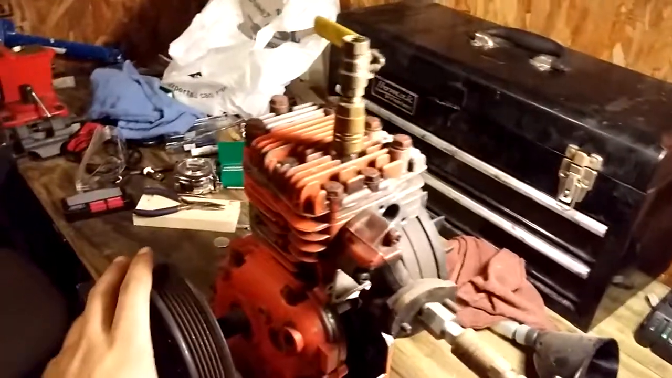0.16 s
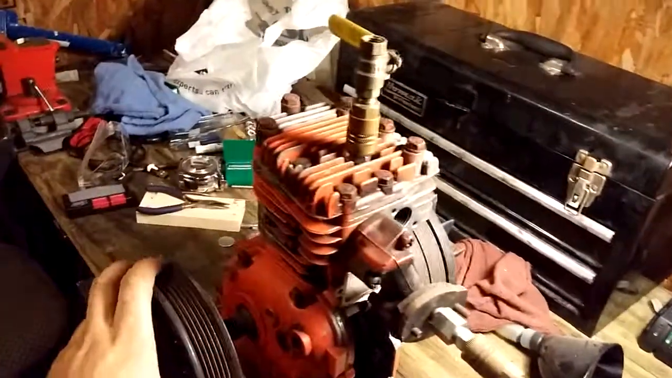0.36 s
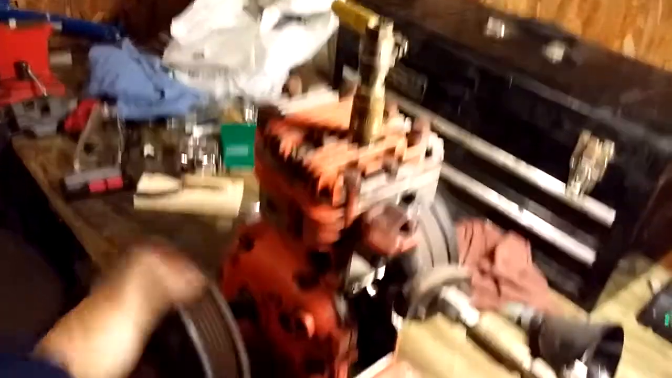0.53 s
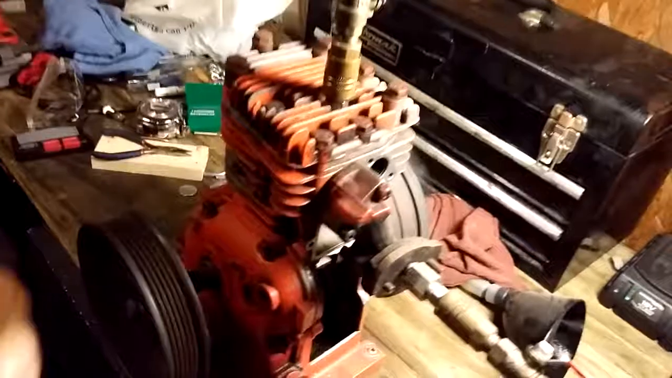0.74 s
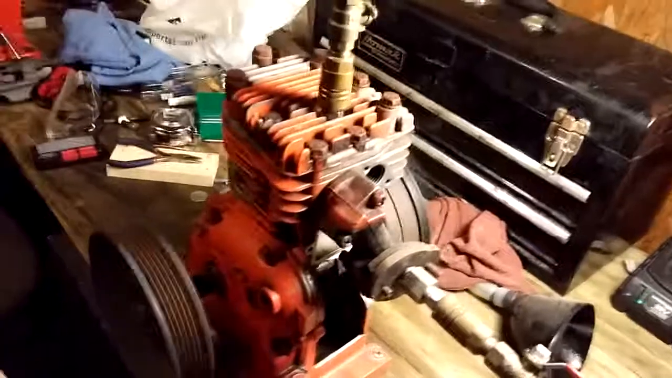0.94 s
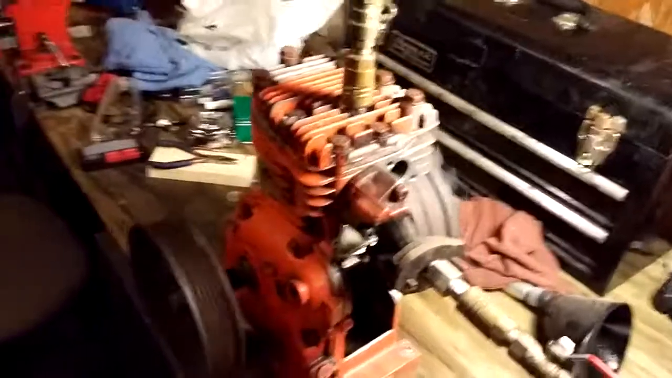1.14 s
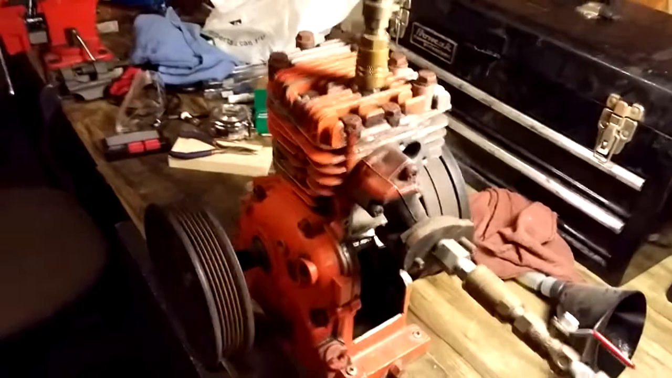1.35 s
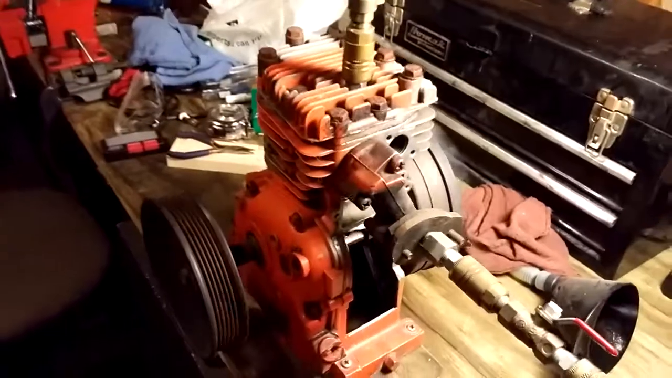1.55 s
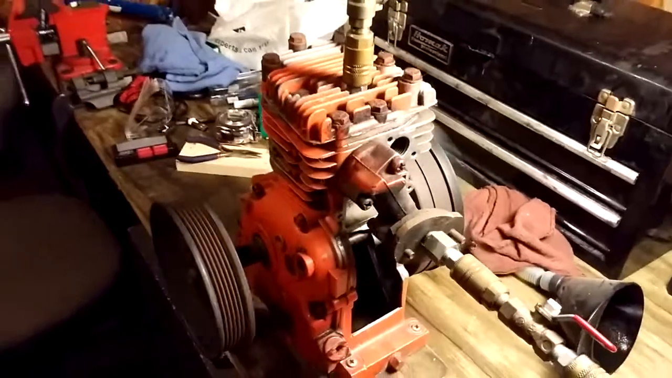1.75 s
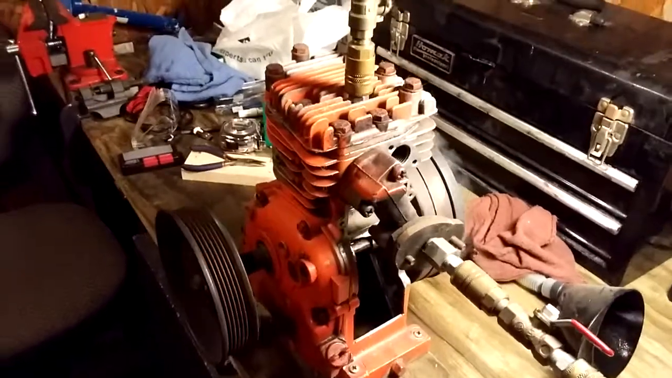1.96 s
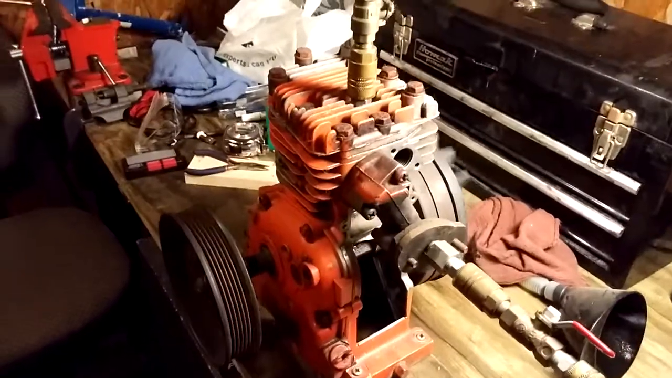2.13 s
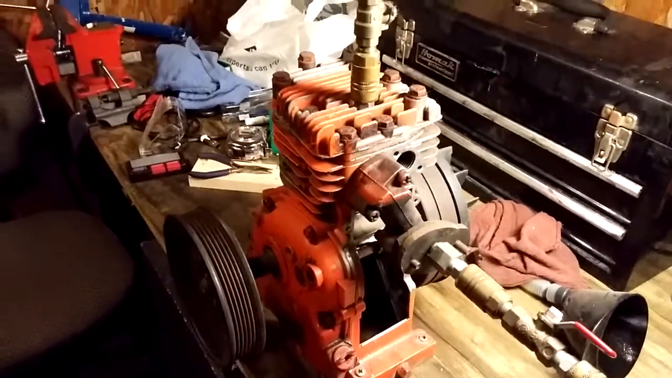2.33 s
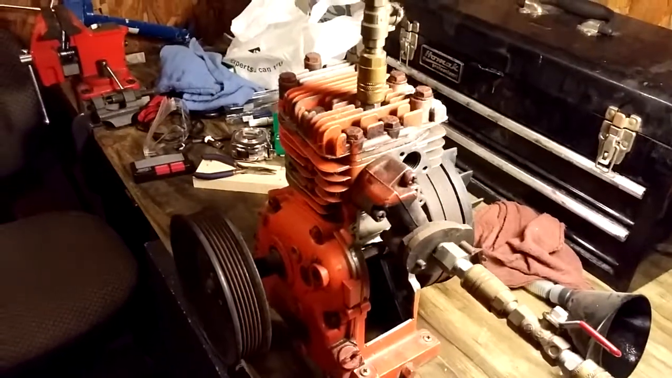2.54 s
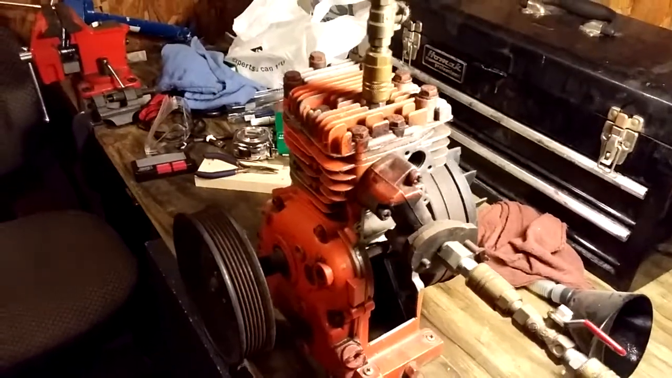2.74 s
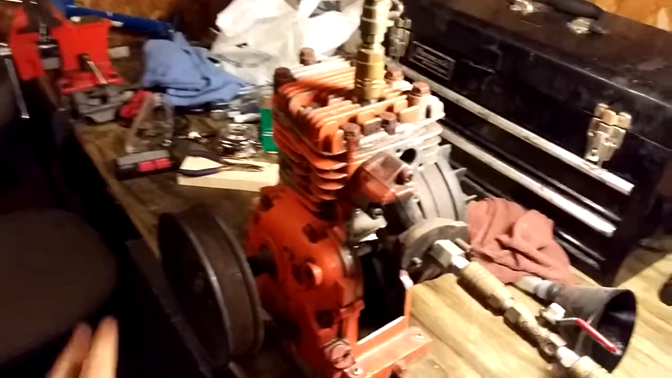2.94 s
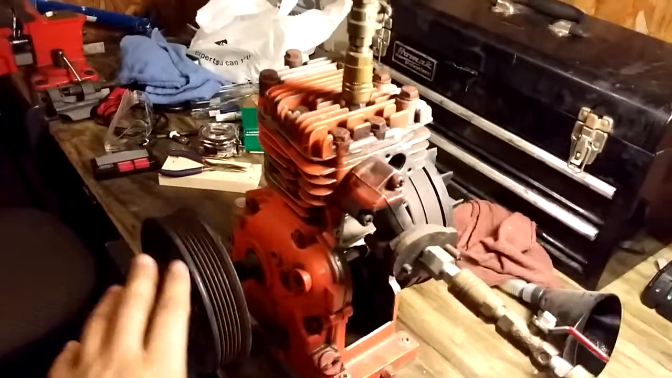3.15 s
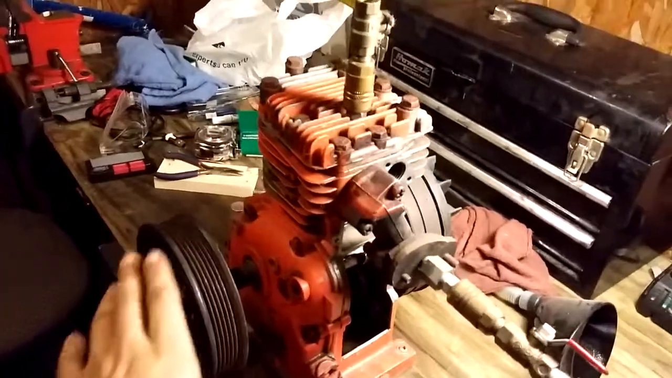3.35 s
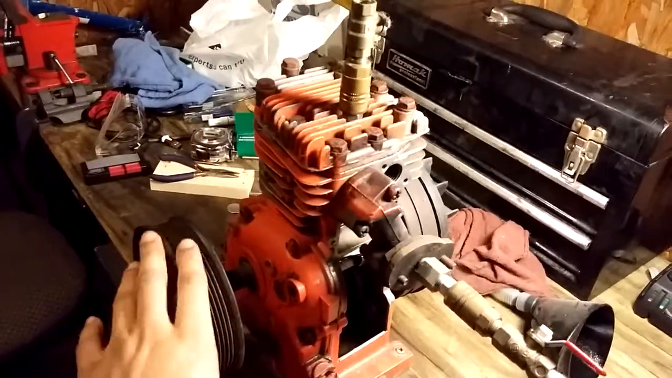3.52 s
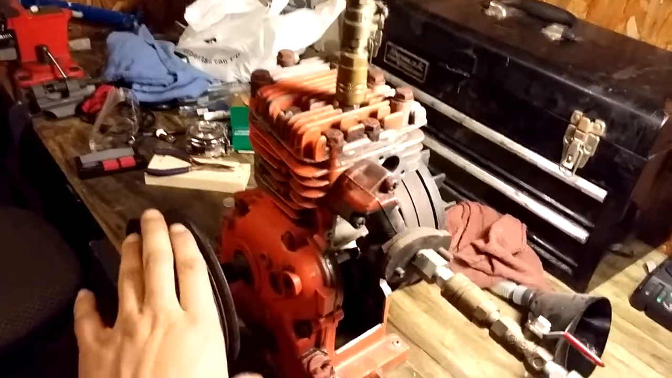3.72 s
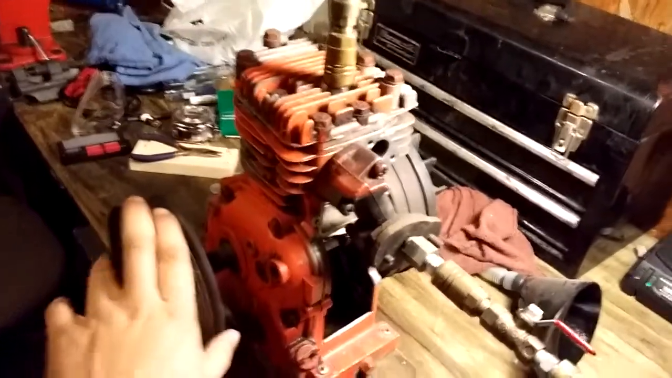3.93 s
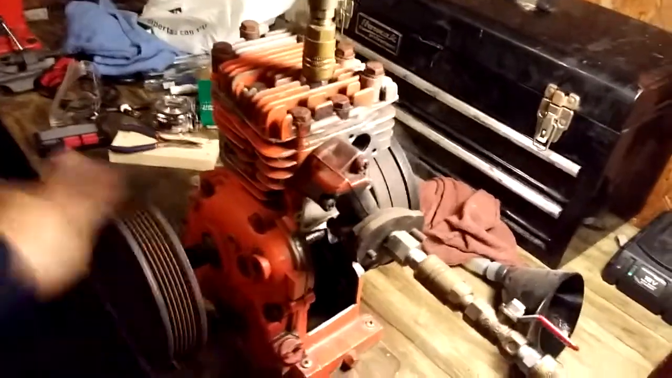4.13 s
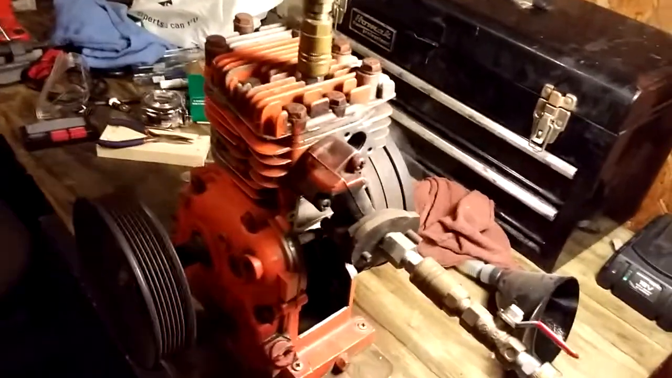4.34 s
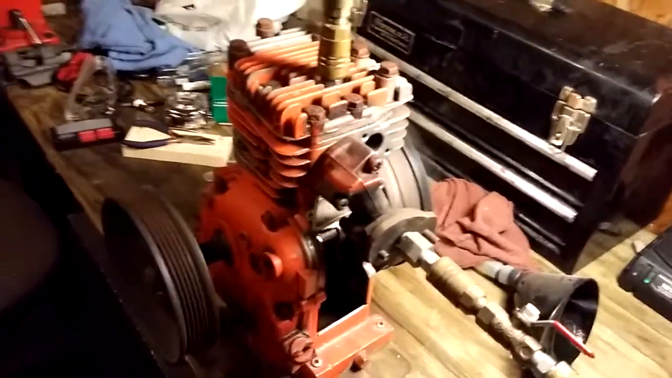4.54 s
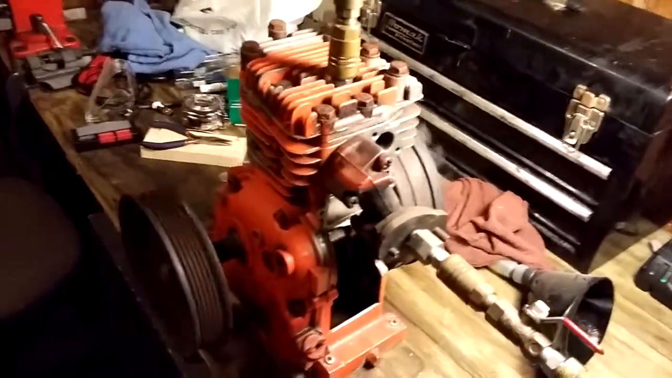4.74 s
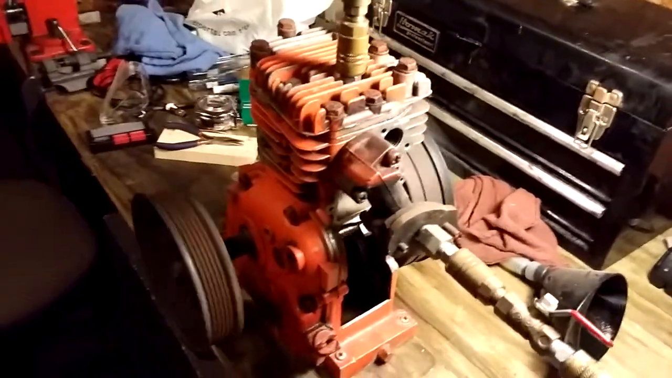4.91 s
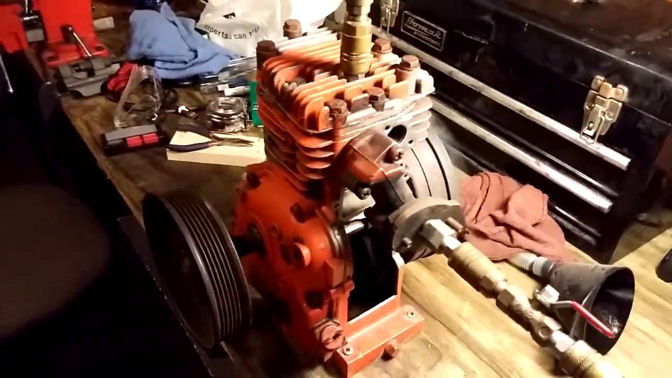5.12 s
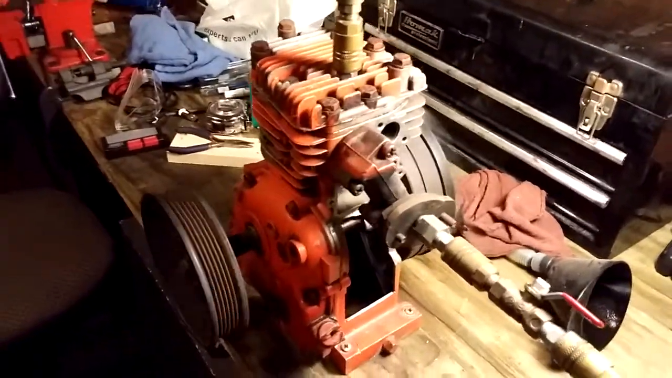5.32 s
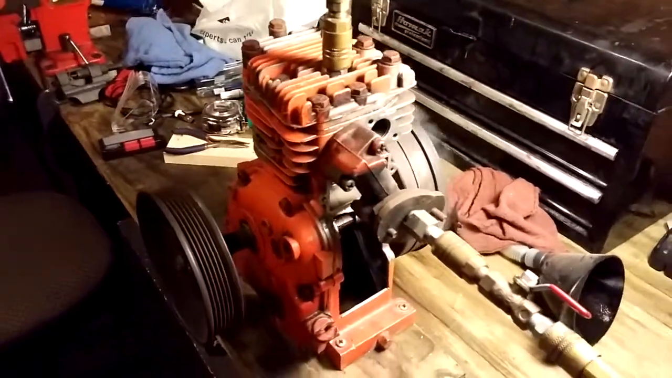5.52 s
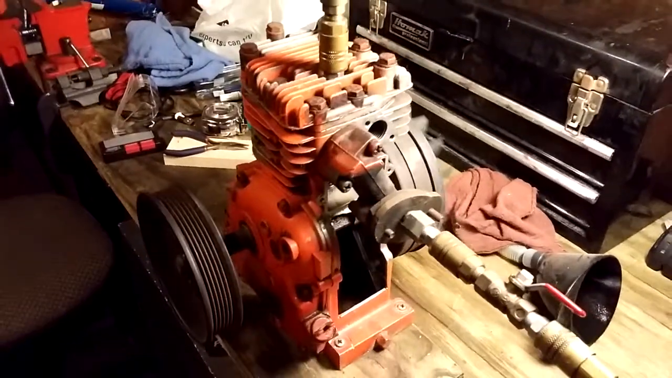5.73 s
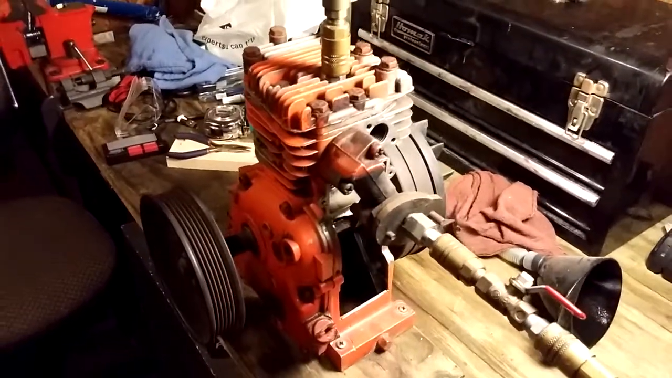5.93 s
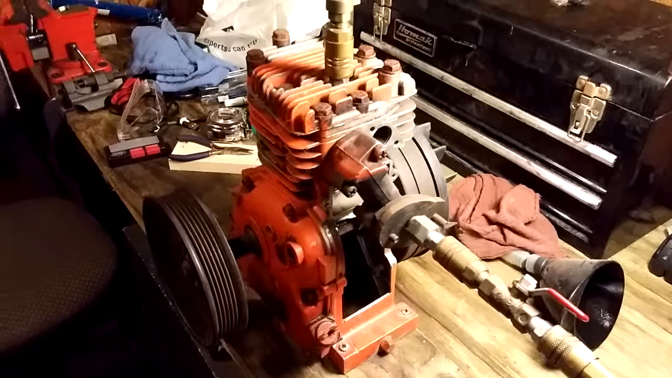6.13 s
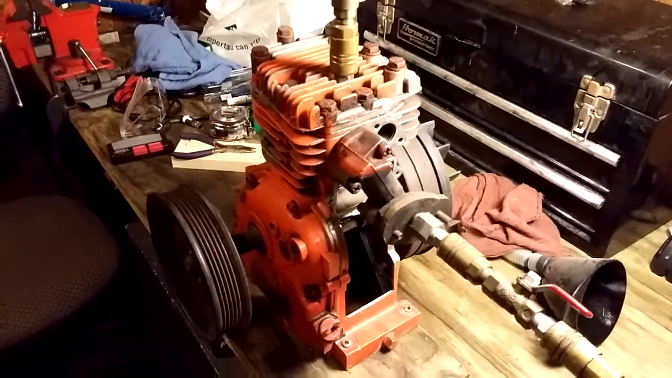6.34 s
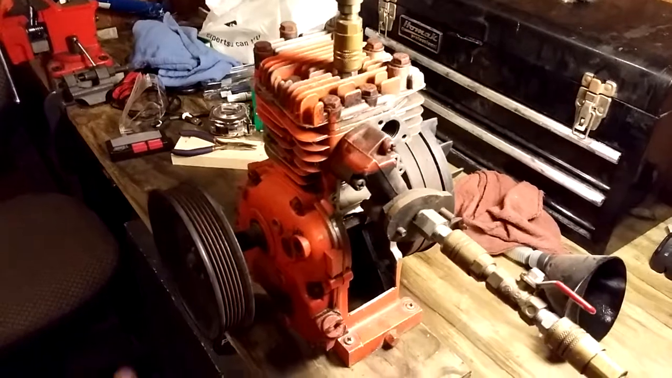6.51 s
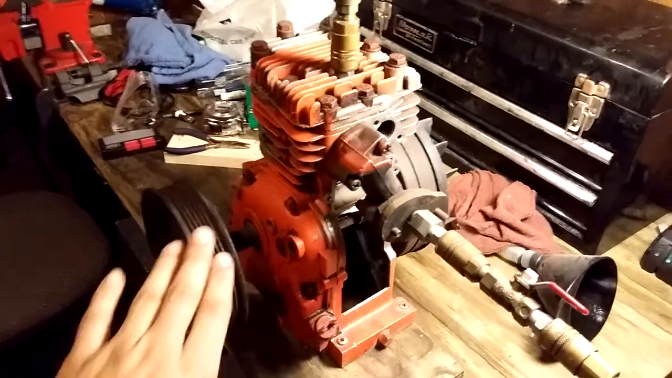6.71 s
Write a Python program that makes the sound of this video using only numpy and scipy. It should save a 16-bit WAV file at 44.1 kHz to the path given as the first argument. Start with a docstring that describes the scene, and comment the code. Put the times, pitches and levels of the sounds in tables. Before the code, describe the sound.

Close stereo sound of a small air-driven engine in a small workshop. A faint leak hisses to the right. The crank clunks, air rushes in, then three quick raspy puffs chirp from the port with low thumps and metallic rattling; a light tick follows. A second, slightly slower and weaker burst comes soon after. The leak nearly stops, resumes, and another pair of bursts follows before near quiet.

```python
"""A small single-cylinder engine on a workbench is flicked over by hand and kicks on compressed air. From the
start a fitting leaks a faint hiss to the right: noise through broad resonances, seeping when shut. Twice come
two bursts, the second slower and on less air: the crank clunks and the inlet rushes in, then three puffs of
resonant noise chirp through the port, while sine modes thump the crankcase and the valve gear rattles. A light
tick follows all but the fourth burst; close echoes and a small workshop answer throughout."""
import sys
import numpy as np
from scipy import signal
from scipy.fft import rfft, irfft, next_fast_len
from scipy.io import wavfile
from scipy.ndimage import uniform_filter1d, map_coordinates

SR = 44100
rng = np.random.default_rng(int(sys.argv[2]) if len(sys.argv) > 2 else 0)


def store_wav(level_fs):
    """Save 16-bit WAV to argv[1]."""
    pcm = np.round(np.clip(np.atleast_2d(level_fs), -1, 1) * 32767)
    wavfile.write(sys.argv[1], SR, pcm.T.astype(np.int16))


N = 302967


def amp(db):
    """Decibels to gain."""
    return 10 ** (np.asarray(db) / 20)


def unit(x):
    """Scale to rms 1."""
    return x / np.sqrt(np.mean(x ** 2) + 1e-20)


def along(points, hz):
    """Read a curve of (Hz, value) points on a log frequency axis."""
    f, v = np.transpose(points)
    return np.interp(np.log(hz + 1), np.log(f + 1), v)


def since(s):
    """Seconds since time s, for every sample."""
    return np.arange(N) / SR - s


def ramp(s, length):
    """Rise from 0 at time s to 1 after length seconds."""
    return np.clip(since(s) / length, 0, 1)


def wobble(rate):
    """A smooth random curve, rate knots a second."""
    knots = rng.standard_normal(int(N * rate / SR) + 4)
    return map_coordinates(knots, [np.arange(N) * rate / SR])


def filtered(x, response):
    """Shape the spectrum of x by a response of frequency."""
    m = next_fast_len(N + 8192)
    spectrum = rfft(x, m) * response(np.fft.rfftfreq(m, 1 / SR))
    return irfft(spectrum, m)[..., :N]


def humps(modes, hz):
    """Gain of steep-sided (Hz, width, dB) resonances, summed in power."""
    power = sum((amp(db) / (1 + 2 * ((hz - c) / w) ** 2)) ** 2 for c, w, db in modes)
    return np.sqrt(power)


def patchy(x, depth_db):
    """Turbulence makes narrow bands swell and fade at random."""
    z = signal.stft(x, nperseg=1024)[2]
    field = uniform_filter1d(rng.standard_normal(z.shape[1:]), size=2, axis=0)
    field = uniform_filter1d(field, size=5, axis=1)
    return signal.istft(z * amp(depth_db * unit(field)), nperseg=1024)[1][:, :N]


def gate(s, length, rise, t60):
    """A valve opens at s over rise seconds; length seconds after s the flow starts to die away."""
    t, out = np.arange(SR // 2) / SR, np.zeros(N + SR)
    opening = np.sin(np.pi / 2 * np.minimum(t / rise, 1)) ** 2
    decay = amp(-60 * np.maximum(t - length, 0) / t60)
    out[max(round(s * SR), 0):][:len(t)] = opening * decay
    return out[:N]


# Stereo tilt of the engine's air. Each row: frequency in Hz, left minus right in dB.
AIR_TILT = [(100, -3), (1000, -1), (2100, -6), (3500, -2), (5500, -3), (7500, -8.5), (9500, -15),
            (11500, -5), (16000, -6.5)]
# How alike the two sides are. Each row: frequency in Hz, left-right likeness from 0 to 1.
LIKENESS = [(350, .88), (1000, 0.36), (2200, .45), (4000, 0.064)]


def air(colour, patchy_db=2.5):
    """Stereo noise of rms 1 from the engine: alike in the bass, its treble beamed to the right."""
    def mix(hz):
        turn = np.arccos(np.clip(along(LIKENESS, hz), -1, 1)) / 2
        return colour(hz) * np.array([np.cos(turn), np.sin(turn)])

    mid, side = filtered(patchy(rng.standard_normal((2, N)), patchy_db), mix)
    stereo = np.array([mid + side, mid - side])
    return unit(filtered(stereo, lambda hz: amp(np.outer([.5, -.5], along(AIR_TILT, hz)))))


# Bursts of three puffs. Each row: first puff in seconds, time from it to the last puff in seconds,
# how long before the first puff air is let in, in seconds, supply pressure in dB.
BURSTS = [(.73, .346, .13, 0), (1.561, .378, .127, -4), (4.293, .336, .146, 0), (5.107, .394, .132, -4)]
MIDDLE_AT = .569  # share of the burst gone by at the middle puff


def puff_times(stroke):
    """When this stroke exhausts, in each burst."""
    start, length, *_ = np.transpose(BURSTS)
    return start + length * {"first": 0, "middle": MIDDLE_AT, "last": 1}[stroke]


# The three strokes at full pressure; with less air the last jet is stronger.
# Each row, by stroke: blast in dB, blast length in seconds, blow-down in dB, blow-down length in seconds,
# jet in dB, jet change in dB per dB of pressure, chirp in dB before its flutter and panning.
STROKES = {"first": (-10, 0.0473, -13.5, .06, -8, 1, -14.5),
           "middle": (-12, .034, -26, .045, -27, 2.5, -17),
           "last": (-10.3, 0.0293, -14, .069, -24, -1.2, -13.7)}
BODY_FOLLOWS = .1  # dB of blast and blow-down per dB of pressure


def puffs(*strokes):
    """Rows of puffs in every burst, set by its pressure: time, then STROKES without the jet change."""
    rows = []
    for stroke in strokes:
        blast_db, blast_length, down_db, down_length, jet_db, jet_follows, chirp_db = STROKES[stroke]
        for s, (*_, pressure_db) in zip(puff_times(stroke), BURSTS):
            body_db = BODY_FOLLOWS * pressure_db
            rows.append((s, blast_db + body_db, blast_length, down_db + body_db, down_length,
                         jet_db + jet_follows * pressure_db, chirp_db))
    return rows


USUAL_BURST_S, SLOW_LAG = .362, .45  # delays grow by this power of the burst's relative length


def after_puffs(pattern):
    """Repeat (stroke, delay, ..) rows in every burst as (s, ..) rows; a slow burst stretches the delays."""
    stretch = (np.transpose(BURSTS)[1] / USUAL_BURST_S) ** SLOW_LAG
    return [(s, *rest) for stroke, delay, *rest in pattern
            for s in puff_times(stroke) + delay * stretch]


def port(levels, turbulence):
    """Colour of air rushing through the port: resonances on a broad bed."""
    modes = [(c, w, db) for (c, w, *_), db in zip(PORT_MODES, levels)]
    return lambda hz: np.hypot(amp(along(turbulence, hz)), humps(modes, hz))


# Exhaust port resonances, levels relative within each colour.
# Each row: frequency in Hz, width in Hz, level in the blast in dB, level in the blow-down in dB.
PORT_MODES = [(955, 260, -7.5, -16.5), (1340, 330, -8.5, -12.5), (1760, 160, -1, -4.5),
              (1970, 220, -1, -17), (2130, 220, -2.5, -0.5), (2298, 110, -7.5, -9), (2495, 110, -0.5, -7),
              (2744, 360, -12, -5.5), (3860, 570, -26.5, -8), (5350, 280, -7, -21),
              (5810, 360, -6.5, -35.5), (6160, 310, -14, -26.5)]
# Turbulence under the blast's resonances. Each row: frequency in Hz, relative level in dB per Hz.
BLAST_BED = [(25, -31.5), (50, -20), (80, -23.5), (300, -23.5), (550, -26.5), (1500, -17), (4700, -14.5),
             (6500, -22), (7500, -25.5), (10000, -26.5), (12500, -32.5), (16000, -29.5)]
# Turbulence under the blow-down's resonances. Each row: frequency in Hz, relative level in dB per Hz.
BLOWDOWN_BED = [(25, -48.5), (52, -20.5), (150, -28), (310, -12.5), (520, -26), (800, -21), (2500, -15.5),
                (4500, -29), (10000, -35), (16000, -39)]
# Colour of the jet. Each row: frequency in Hz, relative level in dB per Hz.
JET_COLOUR = [(25, -22), (52, -0.5), (600, -12), (3000, -8.5), (5500, 3), (7000, -7), (9800, -1.5),
              (11500, -9.5), (15500, -5.5)]


def exhaust():
    """Each puff is a bright blast with a jet on top, then a duller blow-down as the pressure falls."""
    _, _, early_db, late_db = np.transpose(PORT_MODES)
    blast, blowdown, jet = np.zeros((3, N))
    for s, blast_db, blast_length, down_db, down_length, jet_db, _ in puffs("first", "middle", "last"):
        blast += amp(blast_db) * gate(s - .002, blast_length, rise=.015, t60=.09)
        blowdown += amp(down_db) * gate(s, down_length, rise=.045, t60=.11)
        jet += amp(jet_db) * gate(s, .028, rise=.029, t60=.19)
    flutter = amp(1.3 * wobble(260))  # the escaping air sputters
    rush = blast * air(port(early_db, BLAST_BED))
    rush = rush + blowdown * air(port(late_db, BLOWDOWN_BED))
    rush = rush + jet * air(lambda hz: amp(along(JET_COLOUR, hz)))
    return flutter * rush


def whistle(rows, start_hz, end_hz, glide_at, peak_at, width, waver=.035):
    """The port sings for a moment in each puff, gliding as the valve gap changes; times in seconds."""
    t, out = np.arange(SR // 10) / SR, np.zeros(N)
    drift = waver * wobble(350)
    glide = (1 + np.tanh(2 * (t - glide_at) / width)) / 2
    pitch = start_hz + (end_hz - start_hz) * glide
    swell = np.exp(-((t - peak_at) / width) ** 2)
    for s, *_, chirp_db in rows:
        i = round((s - .007) * SR)  # each note's clock starts just ahead of its puff
        phase = 2 * np.pi * np.cumsum(pitch * (1 + drift[i:i + len(t)])) / SR
        out[i:i + len(t)] += amp(chirp_db) * swell * np.sin(phase)
    flutter, pan = amp(4.9 * wobble(250)), amp([[.5], [3.5]])
    return out * flutter * pan


# Colour of the air drawn in. Each row: frequency in Hz, relative level in dB per Hz.
INLET_COLOUR = [(60, -11.5), (200, -5), (350, 1), (520, -16.5), (1400, -10.5), (2400, -3), (3500, -9.5),
                (5400, -6), (9400, -10.5), (15700, -23)]
INLET_DB, INLET_LENGTH_S = -29, .2  # at full pressure, before easing off


def inlet(refill_db, refill_delay, refill_length):
    """Air rushes into the cylinder and eases off as it fills; it refills after each short middle stroke."""
    fills = [(s - lead, INLET_DB + db, INLET_LENGTH_S) for s, _, lead, db in BURSTS]
    refills = [(s + refill_delay, refill_db, refill_length) for s in puff_times("middle")]
    flow = np.zeros(N)
    for s, db, length in fills + refills:
        easing_db = -23 * np.clip(since(s), 0, 1)  # dB, falling steadily through the first second
        flow += amp(db + easing_db) * gate(s, length, rise=.02, t60=.091)
    return flow * air(lambda hz: amp(along(INLET_COLOUR, hz)), patchy_db=4)


# Piston thumps at the end of the long strokes. Each row: stroke, delay after its puff in seconds before
# stretching, ring in dB before a 6 dB trim, swell in seconds, push in dB.
PISTON_THUMPS = [("first", .068, -14.7, .004, -19), ("last", .086, -19.5, .016, -37)]
# Crankcase modes. Each row: settled frequency in Hz, relative level in dB, t60 in seconds.
CASE_MODES = [(267, 0.5, .13), (354, -13, 0.35), (200, -16, 0.34)]


def thumps(sag):
    """The piston's thumps ring the case, slightly sharp at first, and push on the bench."""
    ring, push = np.zeros((2, N))
    t = np.arange(SR // 2) / SR
    for s, ring_db, swell, push_db in after_puffs(PISTON_THUMPS):
        age = t - swell
        clock = age + sag * swell * (1 - np.exp(-t / swell))  # runs fast, then settles
        modes = sum(amp(db - 60 * np.maximum(age, 0) / t60) * np.cos(2 * np.pi * hz * clock)
                    for hz, db, t60 in CASE_MODES)
        ring[round((s - swell) * SR):][:len(t)] += amp(ring_db - 6) * np.minimum(t / swell, 1) * modes
        push += amp(push_db) * gate(s - .005, .004, rise=.0027, t60=.04)
    return ring + push * air(lambda hz: hz / (hz + 60) / (1 + (hz / 330) ** 3), patchy_db=3)


# Valve gear contacts after the long strokes. Each row: stroke, delay after its puff in seconds before
# stretching, body in dB, treble in dB, both before scatter.
CLACKS = [("first", .123, -17, -18.5), ("first", .135, -15.5, -28), ("last", .12, -21, -19),
          ("last", .134, -21.5, -17.5), ("last", .154, -20.5, -27)]
CLACK_SCATTER_DB = .8
# Valve gear resonances. Each row: frequency in Hz, width in Hz, relative level in dB.
GEAR_MODES = [(880, 220, 0.5), (1170, 220, 0), (1450, 200, 0.5), (1880, 350, 3), (2670, 350, 0.5),
              (3160, 400, -2), (4500, 900, -14)]


def rattle(split_hz, ring_t60, chatter_db):
    """Loose valve gear clacks and chatters on; hard contacts wake the iron's upper resonances."""
    times, *levels_db = np.transpose(after_puffs(CLACKS))
    scatter = rng.standard_normal((len(times), 2)).T
    body_db, treble_db = levels_db + CLACK_SCATTER_DB * scatter
    contacts = []
    for s in times:
        clack = gate(s - .001, .00068, rise=.0023, t60=ring_t60)
        chatter = gate(s, 0, rise=.017, t60=.13)
        contacts.append(clack + amp(chatter_db) * chatter)

    def lower(hz):
        return 1 / (1 + (hz / split_hz) ** 6)

    body = amp(body_db) @ contacts * air(lambda hz: humps(GEAR_MODES, hz) * lower(hz))
    treble = amp(treble_db) @ contacts * air(lambda hz: humps(GEAR_MODES, hz) * (1 - lower(hz)))
    return body + treble


# The crank takes up its slack. Each row: start in seconds, level in dB before the knock and hum trims.
CLUNKS = [(0.602, -41.5), (1.429, -26.5), (4.169, -23), (4.974, -26.5)]
# Crank modes, low to high. Each row: frequency in Hz, width in Hz, relative level in dB.
CRANK_MODES = [(200, 22, 3.5), (347, 26, 3.5), (790, 140, -2), (1210, 170, -11)]


def crank():
    """The crank clunks as it starts to turn: a brief knock, then its lower modes hum on."""
    knock = sum(amp(db + 1.5) * gate(s, .0025, rise=.0012, t60=.045) for s, db in CLUNKS)
    hum = sum(amp(db - 4.5) * gate(s, 0, rise=.009, t60=.22) for s, db in CLUNKS)
    knocking = knock * air(lambda hz: humps(CRANK_MODES[1:], hz))
    humming = hum * air(lambda hz: humps(CRANK_MODES[:-1], hz))
    return knocking + humming


# A light tick as the flywheel rocks back. Each row: start in seconds, level in dB.
TICKS = [(1.411, -28.5), (2.415, -30), (4.961, -25.5)]
# Tappet resonances. Each row: frequency in Hz, width in Hz, relative level in dB.
TAPPET_MODES = [(1300, 170, -1.5), (1640, 230, -2.5), (2210, 450, -8.5), (2850, 410, -4)]


def ticks():
    """The tappet drops back lightly and rings on."""
    ring = np.zeros(N)
    for s, db in TICKS:
        tap = gate(s, .0028, rise=.001, t60=.083)
        linger = gate(s, 0, rise=.011, t60=.3)
        ring += amp(db) * (tap + .16 * linger)
    return ring * air(lambda hz: humps(TAPPET_MODES, hz) / (1 + (hz / 3400) ** 8))


# Echoes off the bench and toolbox. Each row: left delay in ms, right delay in ms, level in dB.
ECHOES = [(3.7, 2.95, -17.5), (6.05, 5.35, -11)]


def bench(x):
    """Near surfaces comb the sound, differently for each side."""
    def comb(hz):
        return 1 + sum(amp(db) * np.exp(-2j * np.pi * np.outer([left, right], hz) / 1000)
                       for left, right, db in ECHOES)

    return filtered(x, comb)


# Reverberation of the workshop. Each row: frequency in Hz, t60 in seconds.
WORKSHOP_DECAY = [(400, 0.54), (2000, 0.31), (14000, 0.31)]


def workshop(x):
    """The walls answer with a decaying noise tail; the treble dies first."""
    hz, t, z = signal.stft(rng.standard_normal((2, SR // 2)), SR, nperseg=256)
    decay = amp(-60 * t / along(WORKSHOP_DECAY, hz)[:, None])
    tail = signal.istft(z * decay, SR, nperseg=256)[1]
    return signal.fftconvolve(x, tail / np.linalg.norm(tail[0]), axes=1)[:, :N]


# The fitting leaks freely from when the flywheel is turned by hand until the engine comes to rest.
# Each row: opens in seconds, shuts in seconds, level in dB before sag, waver and panning.
LEAKS = [(-.2, 2.53, -41), (3.28, 6.03, -41.5), (6.5, 7.1, -45.5)]
LEAK_OPEN_S, LEAK_SHUT_S = .16, .04
LEAK_SAG_DB, SEEP_DB = 2.4, -52.3  # drop as each burst uses up air; what seeps through when shut


def leak_level():
    """Level of the leak in dB: it opens, sags with each burst and shuts down to a seep."""
    level = np.full(N, float(SEEP_DB))
    for opens, shuts, db in LEAKS:
        used = sum(ramp(s, length) for s, length, *_ in BURSTS if opens < s < shuts)
        opening = ramp(opens - LEAK_OPEN_S / 2, LEAK_OPEN_S)
        shutting = ramp(shuts - LEAK_SHUT_S / 2, LEAK_SHUT_S)
        level += (opening - shutting) * (db - LEAK_SAG_DB * used - SEEP_DB)
    return level


# Resonances of the leaking fitting. Each row: frequency in Hz, width in Hz, relative level in dB.
LEAK_MODES = [(950, 250, -14), (1700, 610, -10.5), (2606, 400, -9), (5990, 960, -11), (7170, 600, -4.5),
              (8600, 870, -2.5), (9640, 750, 0.7), (9900, 1300, -6), (14800, 3600, -8.5)]
LEAK_LAG_S = .00036  # the hiss reaches the left later


def leak(hiss_db):
    """Air hisses from the fitting as resonant turbulence, well to the right."""
    noise = patchy(rng.standard_normal((2, N)), depth_db=2)
    hiss = unit(filtered(noise, lambda hz: humps(LEAK_MODES, hz)))
    late = filtered(hiss[1], lambda hz: np.exp(-2j * np.pi * hz * LEAK_LAG_S))
    hiss[0] = .6 * hiss[0] + .8 * late
    return amp(hiss_db) * hiss * amp([[-16], [2.5]])


# Colour of the workshop background. Each row: frequency in Hz, relative level in dB per Hz.
FLOOR_COLOUR = [(25, -7.5), (85, 9.5), (200, -7.5), (360, 7), (480, -2.5), (850, 1), (3000, -4.5),
                (15000, -1)]


def background(hiss_db):
    """Even workshop noise, its bass shared by both sides; its level follows the leak a little."""
    def colour(hz):
        alike = along(LIKENESS, hz)
        shares = np.sqrt(np.abs([alike, 1 - alike, 1 - alike]))
        return amp(along(FLOOR_COLOUR, hz)) * shares

    shared, left, right = filtered(rng.standard_normal((3, N)), colour)
    level_db = -53.5 + .4 * (hiss_db - hiss_db.mean())
    return amp(level_db) * unit(shared + np.array([left, right]))


def scene():
    """The engine in its room; the long strokes chirp upward, the short middle stroke whistles downward."""
    rising = whistle(puffs("first", "last"), start_hz=1794, end_hz=2199,
                     glide_at=.022, peak_at=.02, width=.012)
    falling = whistle(puffs("middle"), start_hz=2516, end_hz=1800,
                      glide_at=.018, peak_at=.036, width=.016)
    intake = inlet(refill_db=-36, refill_delay=.07, refill_length=.1)
    gear = rattle(split_hz=2710, ring_t60=.028, chatter_db=-11.5)
    engine = bench(exhaust() + rising + falling + intake + gear + ticks()) + crank()
    hiss_db = leak_level() + .3 * wobble(8.1)
    room = amp(-10.5) * workshop(engine)
    return engine + room + thumps(sag=.23) + leak(hiss_db) + background(hiss_db)


def record(dry):
    """The microphone rounds off the highest peaks and keeps nothing above its band limit."""
    rounded = dry / (1 + np.abs(dry / .97) ** 5) ** (1 / 5)
    return filtered(rounded, lambda hz: hz < 15850)


dry = scene()
out = record(dry)
store_wav(out)
```